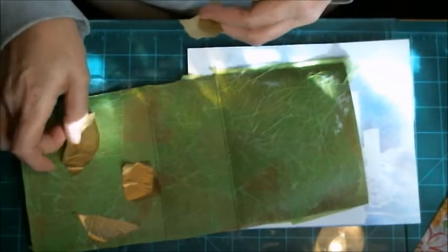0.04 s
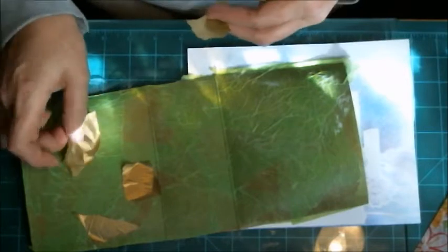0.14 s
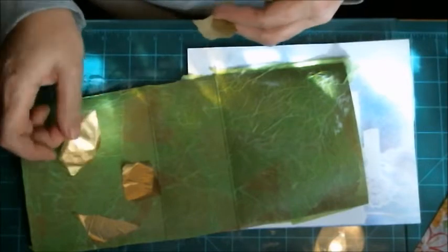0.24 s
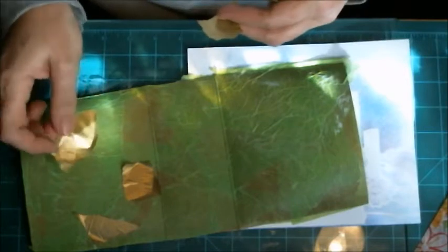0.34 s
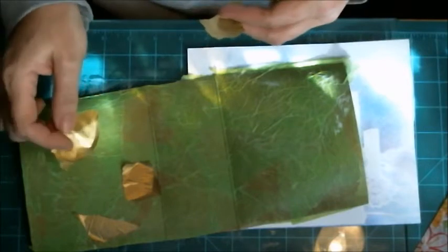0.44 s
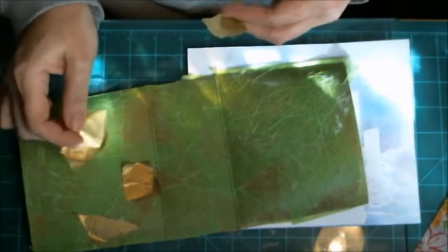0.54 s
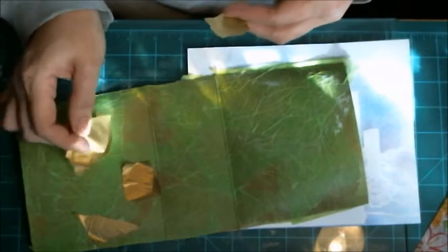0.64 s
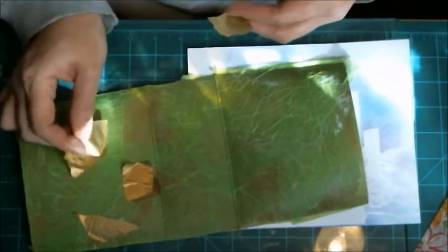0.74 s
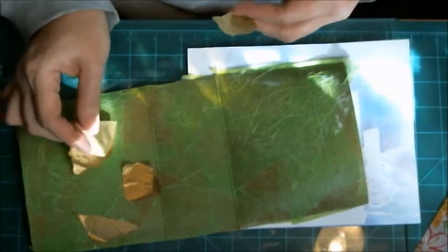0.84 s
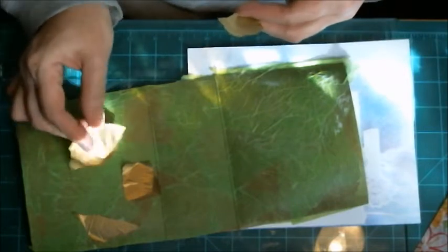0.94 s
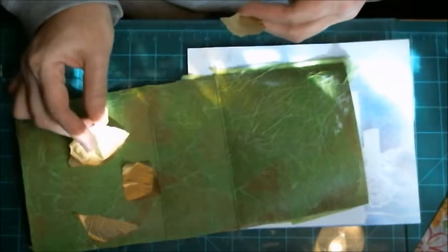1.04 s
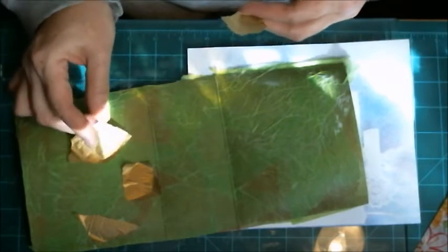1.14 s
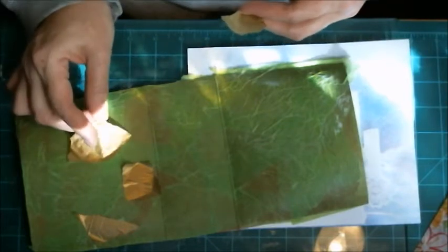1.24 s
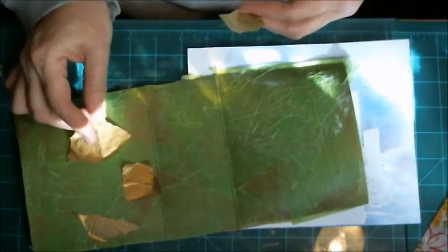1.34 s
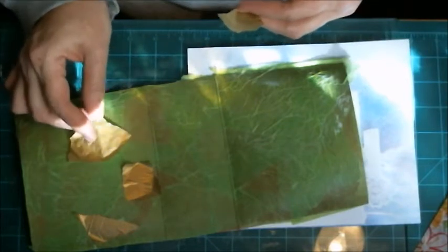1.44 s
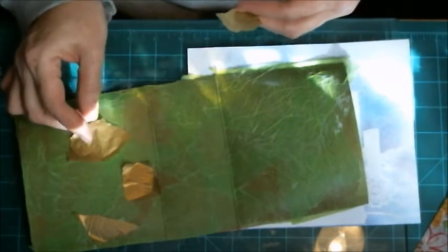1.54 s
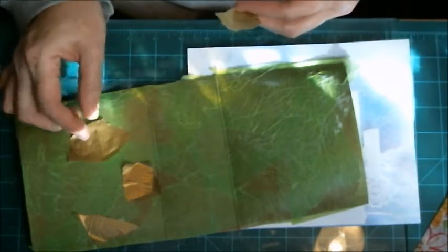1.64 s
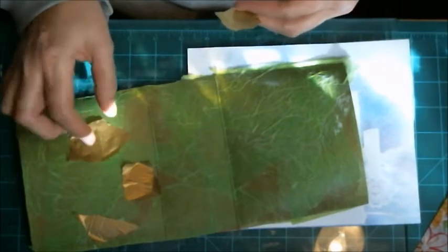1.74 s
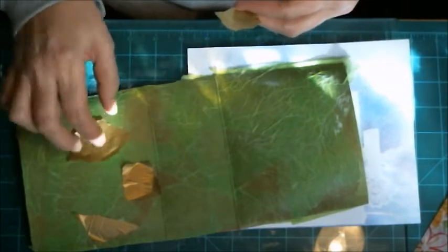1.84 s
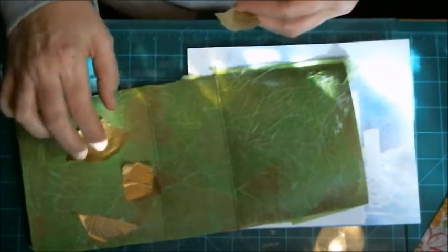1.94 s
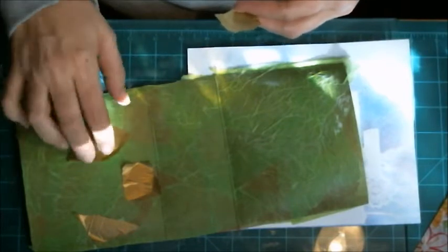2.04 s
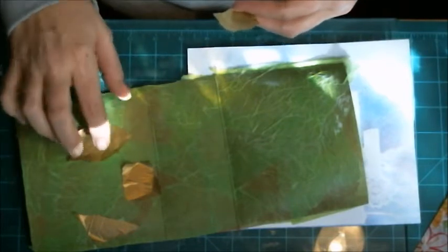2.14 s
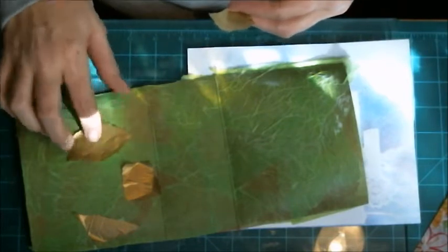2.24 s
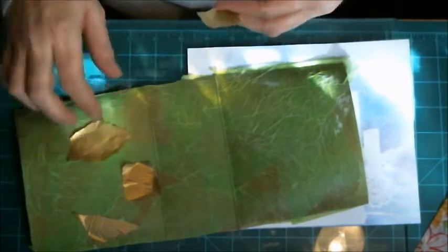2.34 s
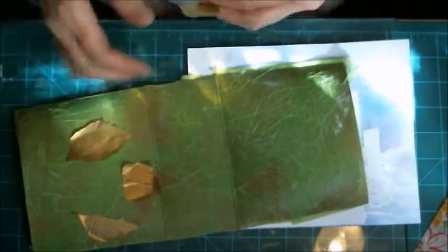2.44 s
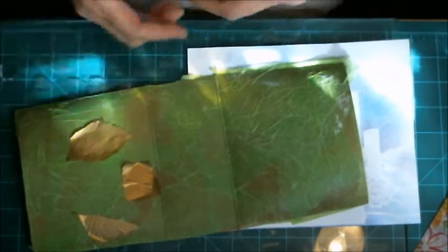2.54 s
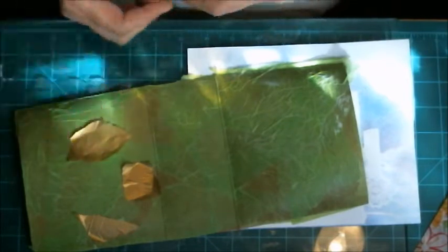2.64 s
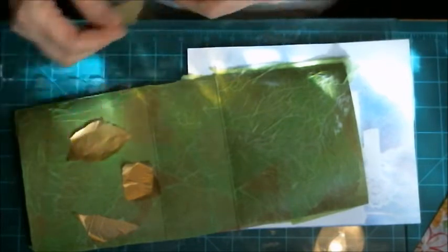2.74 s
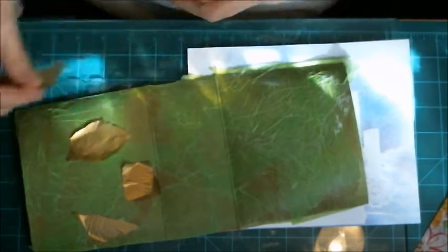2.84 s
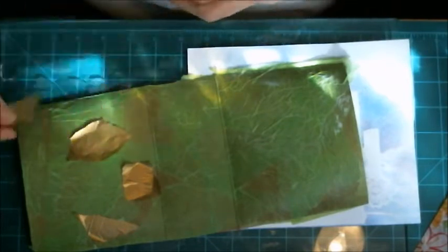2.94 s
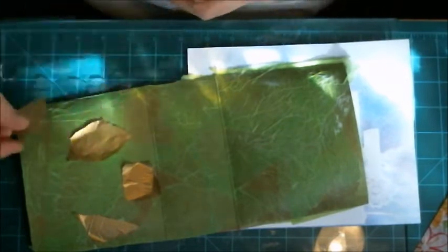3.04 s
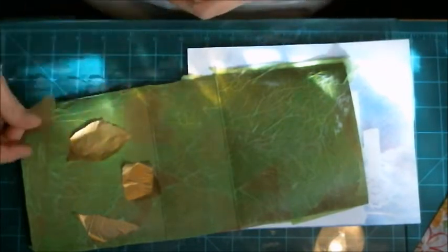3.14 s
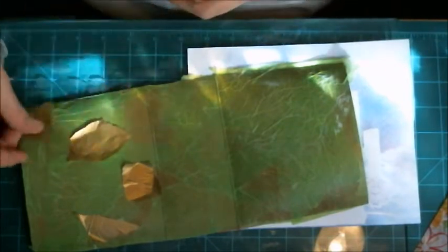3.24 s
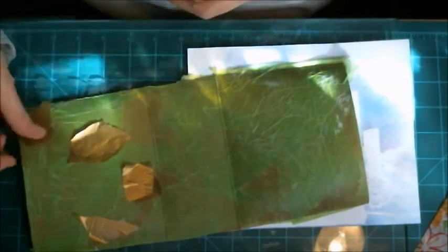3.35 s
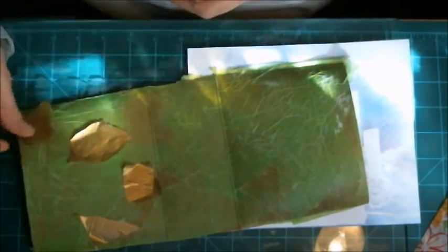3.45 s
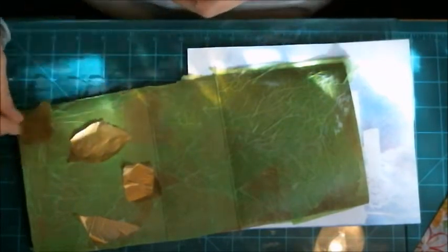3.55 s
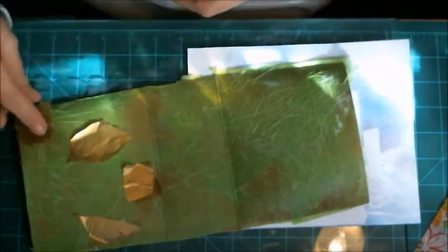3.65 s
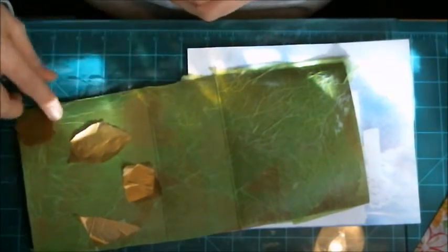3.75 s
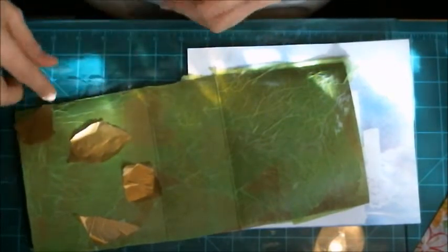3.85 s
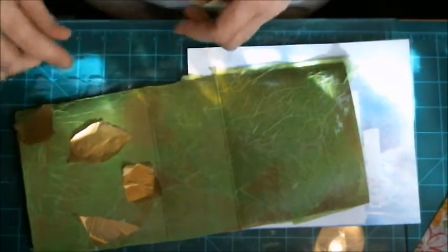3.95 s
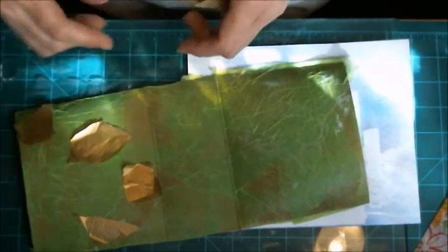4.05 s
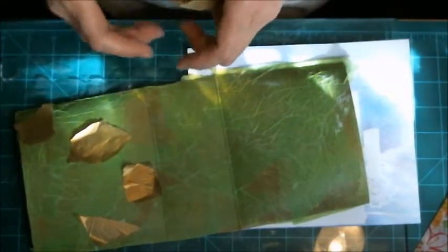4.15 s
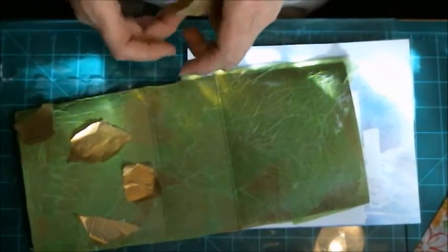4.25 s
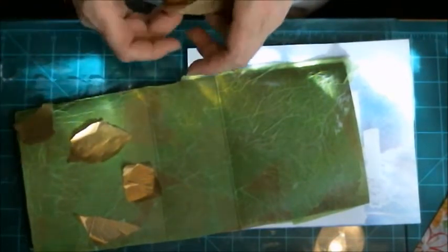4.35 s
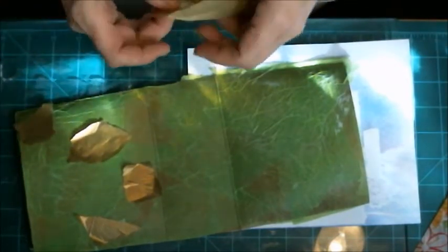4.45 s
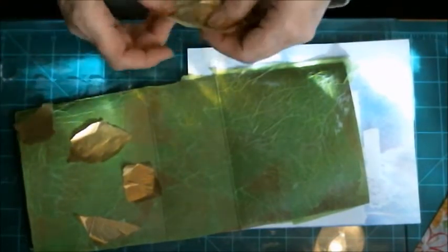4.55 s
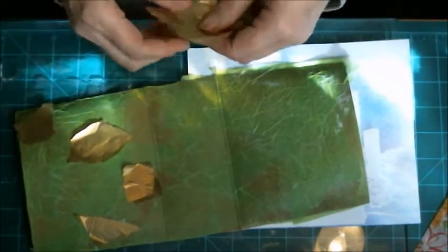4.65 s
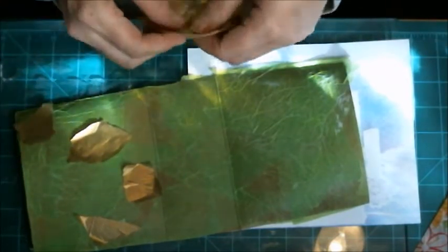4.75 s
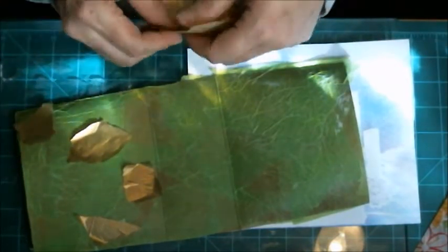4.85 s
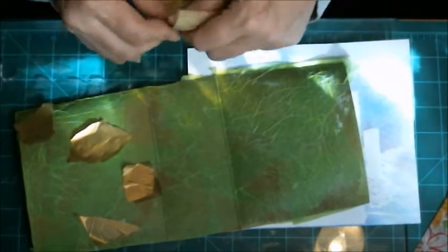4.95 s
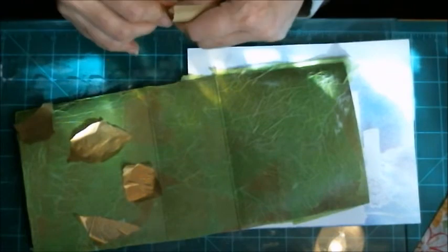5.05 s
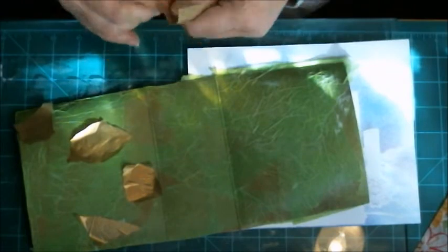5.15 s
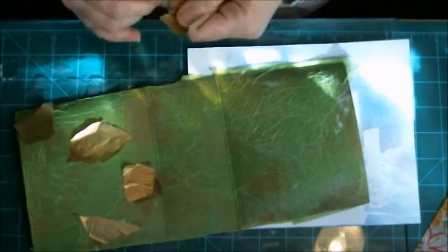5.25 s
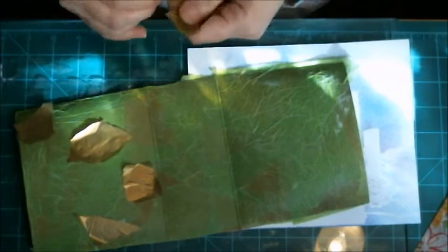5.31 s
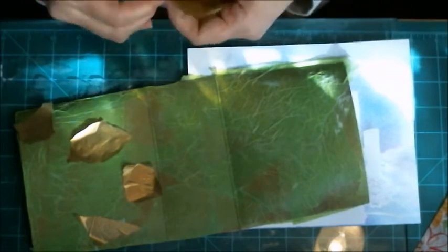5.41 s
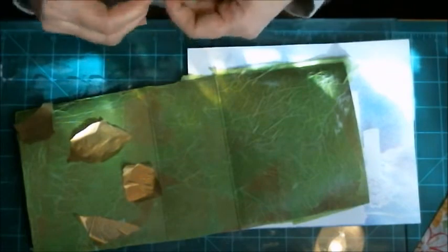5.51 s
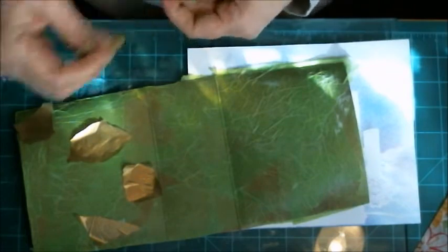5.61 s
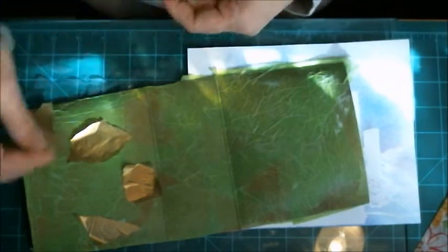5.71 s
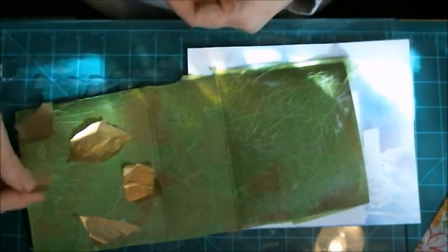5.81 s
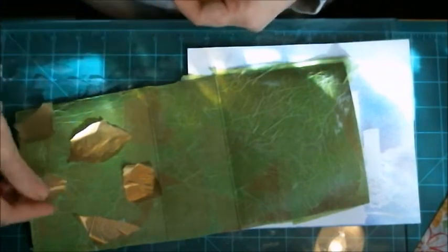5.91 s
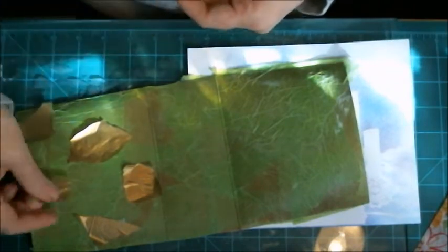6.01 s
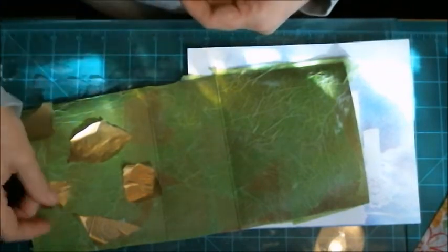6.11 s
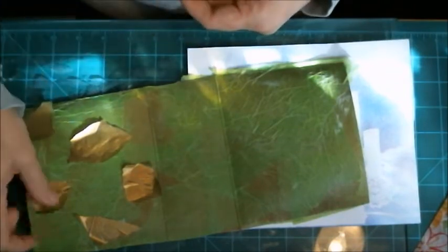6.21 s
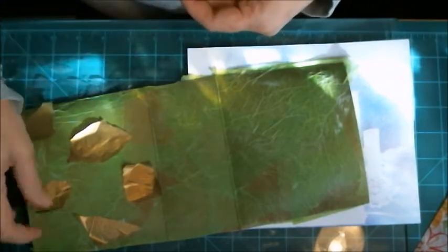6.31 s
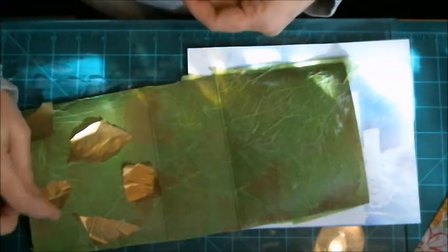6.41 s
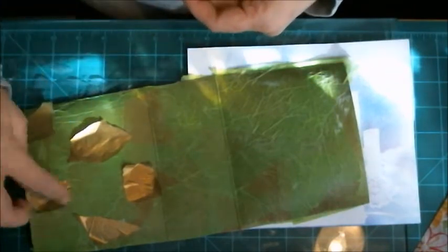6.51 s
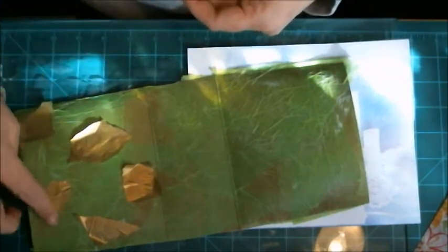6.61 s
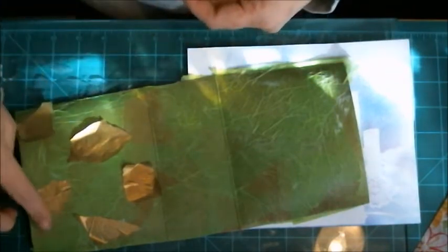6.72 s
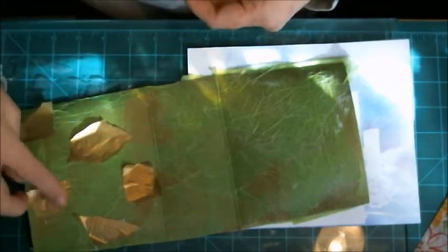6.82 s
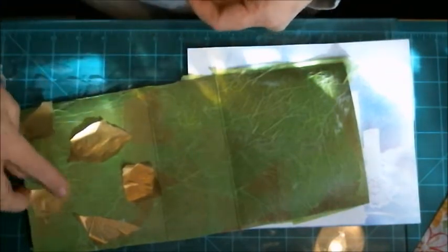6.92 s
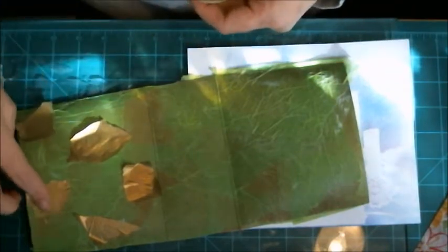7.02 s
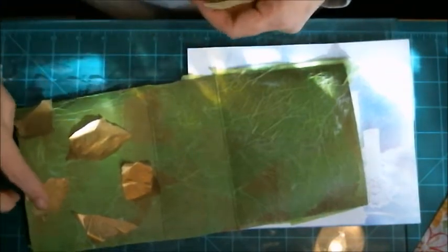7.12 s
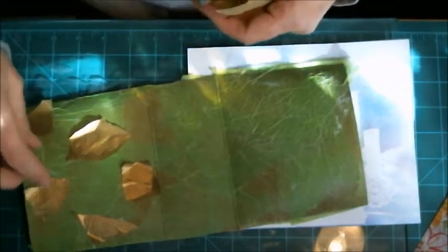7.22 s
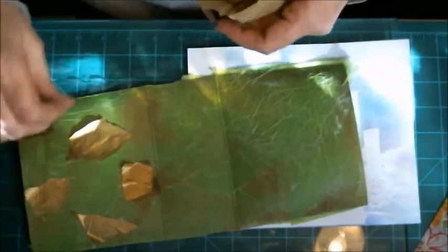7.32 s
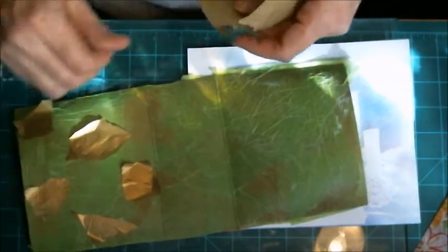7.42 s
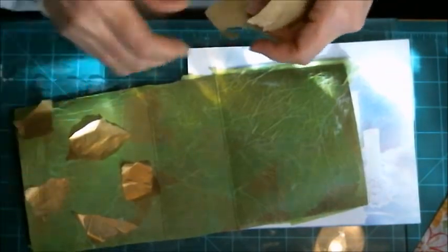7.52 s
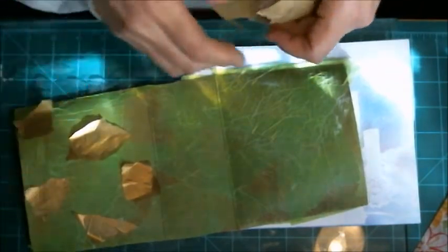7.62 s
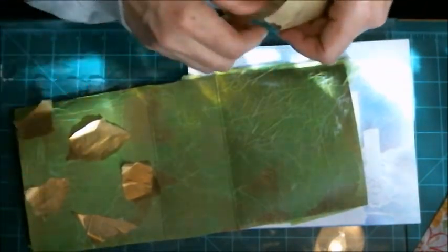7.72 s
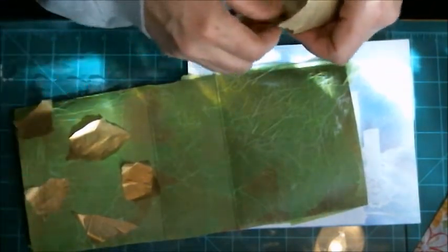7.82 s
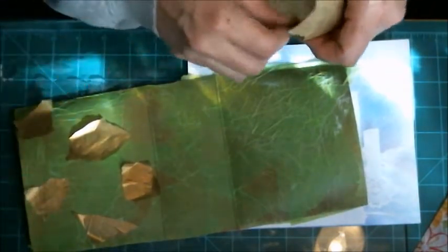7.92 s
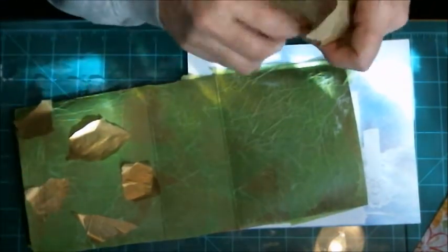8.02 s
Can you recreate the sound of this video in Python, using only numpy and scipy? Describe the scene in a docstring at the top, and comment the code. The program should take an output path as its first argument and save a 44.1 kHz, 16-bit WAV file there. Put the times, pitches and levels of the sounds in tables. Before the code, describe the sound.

Close-up of stiff metallic paper handled over a cutting mat. A few crisp crinkles and small ticks come first, with hushed gaps. Light rustling builds from about two seconds into dense, loud tearing with sharp snaps around five, ending in a hard pop. Sparse ticks and near silence follow, then crackle returns and swells to a loud tear at the end. Dry, narrow-band sound with faint low hiss.

```python
"""Bright foil crackle and sharp snaps come in bouts as fingers lay out, pinch and tear stiff foil paper.
Clumped clicks ring foil facets and bending modes of the sheet; shaped noise bursts make the creases
that snap, the dull pats and flaps of a sheet handled on a cutting mat, and narrow ringing notes.
The sound is close and narrow-band: a suppressor cuts the weak bands, a soft hiss stays underneath,
and a limiter holds down the loudest creases."""
import sys
import numpy as np
from scipy import signal
from scipy.fft import rfft, irfft, next_fast_len
from scipy.io import wavfile
from scipy.ndimage import uniform_filter1d, minimum_filter1d

SR = 44100
rng = np.random.default_rng(int(sys.argv[2]) if len(sys.argv) > 2 else 0)


def int16_out(signal):
    """Quantize to a 16-bit WAV file."""
    q = np.round(np.clip(np.atleast_2d(signal).T, -1, 1) * 32767)
    wavfile.write(sys.argv[1], SR, q.astype(np.int16))


N = 355887

# Strong creases that buckle. Each row: start in seconds, peak of the bright crack in dB,
# pitch of its facet in Hz, peak of its low part against the crack in dB.
CREASES = [(0.0255, -24.5, 7000, -43), (0.0578, -20, 7100, -46), (0.153, -26, 6900, -29),
           (0.1827, -17.5, 6900, -44), (0.557, -25, 6800, -32), (0.5658, -19, 3340, -38),
           (0.6355, -27, 6450, -35), (0.8535, -29.5, 7240, -32), (0.9075, -49, 3000, -1.5),
           (1.0274, -37, 6830, -15), (1.1972, -33.5, 6800, -30), (1.221, -34, 4600, -29),
           (1.292, -37.5, 7240, -17), (1.686, -24, 7540, -27), (1.7565, -26.5, 5530, -23),
           (2.265, -14.5, 7500, -17.5), (2.3059, -12, 6000, -26.5), (2.4014, -14.5, 3580, -23),
           (2.467, -23.5, 4500, -26), (2.5748, -13.5, 6850, -23), (2.6179, -10.5, 6100, -24),
           (2.7675, -24, 5000, -47), (2.8103, -26, 5000, -46), (2.9754, -24, 7100, -44),
           (3.001, -19.5, 4730, -28), (3.0206, -14.5, 7000, -28), (3.113, -27.5, 7240, -21),
           (3.149, -17.5, 4970, -35), (3.2255, -22, 7100, -31), (3.39, -35.5, 4800, -24),
           (3.668, -27.5, 7200, -20), (3.833, -15, 7300, -19), (3.9263, -16.5, 7250, -29),
           (3.9613, -28, 5800, -32), (4.0408, -15.5, 7000, -24.5), (4.082, -16.5, 5550, -37),
           (4.1301, -17.5, 6850, -26), (4.2431, -16, 6500, -21.5), (4.263, -17.5, 5900, -30),
           (4.3195, -15, 5300, -16.5), (4.4284, -8.5, 4600, -16), (4.4426, -8, 7260, -17.5),
           (4.514, -8.5, 6300, -15.5), (4.576, -13, 6900, -9), (4.6148, -2.5, 6040, -20.5),
           (4.6402, -0.5, 6800, -25), (4.718, -16, 6000, -20), (4.7563, -10, 6800, -16),
           (4.7945, -8, 6700, -21.5), (4.8285, -11, 5700, -20), (4.854, -3, 6040, -16.5),
           (4.917, -5.5, 6200, -21), (4.9364, -13, 6600, -27), (4.948, -8.5, 3300, -30),
           (4.989, -9, 6700, -20), (5.025, 1, 7000, -26.5), (5.0612, -11, 5100, -9),
           (5.0985, 0, 6800, -30.5), (5.1146, -3.5, 6000, -28), (5.1745, -7, 5950, -14),
           (5.2317, -3, 4800, -26), (5.2567, -10.5, 6300, -38), (5.3389, -8.5, 7000, -30),
           (5.3586, -7, 6760, -22), (5.4025, 1.5, 6950, -28), (5.4403, -5, 7180, -36),
           (5.4614, 5, 7000, -35), (5.5031, 5, 6100, -18.5), (5.6458, -23, 6800, -30),
           (5.6894, -14, 6900, -26), (5.7142, -10.5, 7300, -17), (5.7533, -12, 6650, -45),
           (5.7728, -17.5, 6000, -31), (5.8067, -25.5, 5360, -24), (6.076, -25, 5200, -36),
           (6.114, -30, 5600, -34), (6.346, -33.5, 4300, -10.5), (6.4633, -39, 7300, -10),
           (6.9874, -29.5, 7300, -37), (7.0012, -19, 7200, -43), (7.111, -25, 7000, -20),
           (7.1255, -15.5, 7100, -17), (7.1476, -18, 7000, -21), (7.239, -23.5, 5700, -17),
           (7.2918, -23, 6700, -36), (7.3035, -19, 5160, -32), (7.3733, -24.5, 5130, -45),
           (7.3985, -29, 7000, -34), (7.4225, -19, 4500, -63), (7.484, -24, 5130, -34),
           (7.4998, -21, 6840, -23), (7.577, -9.5, 4970, -27), (7.6414, -20.5, 4200, -22),
           (7.703, -15.5, 6400, -29), (7.774, -6.5, 6600, -32), (7.784, -4.5, 6700, -27),
           (7.8072, -11.5, 6600, -23.5), (7.852, -15.5, 2940, -18), (7.8888, -9, 3200, -19),
           (7.92, -10, 7000, -27), (7.9448, -5, 6100, -19), (7.9588, 0.5, 5470, -29),
           (7.989, -3.5, 5760, -18), (8.016, -15, 6700, -20), (8.0545, -3, 5500, -29)]
# Colour of the foil. Each row: frequency in Hz, relative level in dB per Hz.
FOIL_COLOUR = [(1200, -40), (2300, -13.5), (3600, -11.5), (5500, -8), (7200, -2.5), (7800, -9.5)]
# A crease with more low part also reaches further into the large facets (dB per dB).
DEPTH_FOLLOWS = 0.37


def gain_of(db):
    """Decibels to gain."""
    return 10 ** (np.asarray(db) / 20)


def evened(x):
    """Scales to rms 1."""
    return x / np.sqrt(np.mean(x ** 2) + 1e-20)


def colour_gain(points, hz):
    """Reads a colour table on a log-frequency axis, as gain."""
    f, level_db = np.transpose(points)
    return gain_of(np.interp(np.log(hz + 1), np.log(f + 1), level_db))


def add(mix, s, sound):
    """Mixes a sound in at s seconds."""
    part = mix[round(s * SR):][:len(sound)]
    part += sound[:len(part)]


def bump(hz, centre_hz, width_hz):
    """Gain of a resonance over frequency, 3 dB down at the edges of its width."""
    return 1 / np.sqrt(1 + (2 * (hz - centre_hz) / width_hz) ** 2)


def coloured(x, gain):
    """Shapes the spectrum of x by gain(hz)."""
    size = next_fast_len(len(x))
    return irfft(rfft(x, size) * gain(np.fft.rfftfreq(size, 1 / SR)), size)[:len(x)]


def burst(noise, gain, db, t60, rise):
    """Coloured noise that swells quickly and dies away, with the given peak."""
    t = np.arange(len(noise)) / SR
    swell = 1 - np.exp(-(t / rise) ** 2)
    x = coloured(noise, gain) * swell * gain_of(-60 * t / t60)
    return gain_of(db) * x / abs(x).max()


def drift(s):
    """Slow chance that holds for about s seconds, at rms 1."""
    return evened(uniform_filter1d(rng.standard_normal(N), max(int(s * SR), 1)))


def smoothed(z, frames):
    """Averages a spectrogram over 3 bands and the given number of frames."""
    return uniform_filter1d(uniform_filter1d(z, size=3, axis=0), size=frames, axis=1)


def handling():
    """Level of the steady crackle, silent between bouts, and the share of the sheet's rattle in dB."""
    # One list per bout. Each row: time in seconds, steady crackle level in dB,
    # share of the held sheet's low rattle in dB.
    bouts = [
        [(0.0, -49, -17), (0.1, -31.5, -26.5), (0.17, -57, -6.5), (0.23, -66.5, 1), (0.32, -51, -22)],
        [(0.86, -57, -28), (0.92, -49.5, -14), (1.0, -70, -12)],
        [(2.16, -67, 4), (2.185, -52.5, -0.5), (2.25, -62.5, 4), (2.3, -38.5, -17.5), (2.52, -40, -22),
         (2.64, -40, -15), (2.74, -48.5, -5), (2.8, -43.5, -14), (2.87, -55.5, -32), (2.94, -46, -27),
         (3.02, -54, 6), (3.1, -50, -34), (3.25, -50, -6.5), (3.33, -68, -23), (3.38, -55.5, -27),
         (3.45, -61, -20)],
        [(3.6, -56, -24), (3.65, -51, -1), (3.68, -46.5, -10), (3.87, -43, -19.5), (4.12, -37.5, -20.5),
         (4.3, -30.5, -22), (4.5, -23, -24.5), (4.63, -20.5, -19), (4.72, -27.5, -20), (4.9, -23, -17.5),
         (5.0, -21.5, -22), (5.12, -15.5, -23), (5.27, -18, -21.5), (5.3, -29, -16.5), (5.39, -28, -10.5),
         (5.42, -15, -11), (5.53, -18, -19.5), (5.6, -39, -16.5), (5.77, -32.5, -8.5), (5.87, -53, -11.5),
         (6.05, -57, -9.5), (6.12, -41, -28), (6.2, -61.5, -6.5)],
        [(6.85, -55, -6), (6.93, -50, -17), (6.98, -55, -15.5), (7.03, -38.5, -20.5), (7.14, -38, -11),
         (7.2, -46, -16), (7.25, -32, -26), (7.34, -41, -25), (7.4, -52.5, -23), (7.5, -33.5, -28.5),
         (7.56, -37, -14.5), (7.69, -43, -20.5), (7.76, -40.5, -18.5), (7.86, -32, -24), (7.92, -14.5, -20),
         (8.03, -17, -14.5), (8.07, -12.5, -19)],
    ]
    s, level_db, low_db = np.transpose([row for bout in bouts for row in bout])
    t = np.arange(N) / SR
    active = sum((t > bout[0][0]) * (t < bout[-1][0]) for bout in bouts)
    fade = uniform_filter1d(active * 1., 800)  # softens the ends of each bout
    return gain_of(np.interp(t, s, level_db)) * fade, np.interp(t, s, low_db)


def settling():
    """Level of the crackle each snap leaves behind as its crease settles, in small and large facets."""
    settle_db, settle_t60, rise_s = -15, 0.13, .004  # dB against the snap's peak, s, s
    small, large, t = np.zeros(N), np.zeros(N), np.arange(0, .3, 1 / SR)
    for s, db, _, low_db in CREASES:
        power = gain_of(db + settle_db - 60 * t / settle_t60) ** 2 * (1 - np.exp(-t / rise_s))
        add(small, s, power)
        add(large, s, power * gain_of(DEPTH_FOLLOWS * low_db) ** 2)
    return np.sqrt(small), np.sqrt(large)


def fibres(per_s, clumps_db):
    """Parting fibres: sparse clicks of uneven size that come in clumps of loudness."""
    spread_db = 2.5
    hit, size, sign = rng.random((3, N))
    size_db = -spread_db * np.log(size + .01) + clumps_db
    return gain_of(size_db) * (hit < per_s / SR) * np.sign(sign - .5)


def facets():
    """Parting fibres ring foil facets for a few cycles each; returns small and large facets apart."""
    fibres_per_s = 6800  # shared by ten facet pitches
    tau = np.arange(256) / SR
    small, large, clumps_db = np.zeros(N), np.zeros(N), 3.3 * drift(0.0021)
    for hz in np.geomspace(2300, 7600, 10):
        ring = np.sin(2 * np.pi * hz * tau) * np.exp(-tau * hz)
        clicks = fibres(fibres_per_s / 10, clumps_db + 2.3 * drift(0.019))
        ringing = np.sqrt(hz) * signal.oaconvolve(clicks, evened(ring))[:N]
        add(small if hz > 4500 else large, 0, ringing)
    return [evened(coloured(x, lambda hz: colour_gain(FOIL_COLOUR, hz))) for x in (small, large)]


def sheet_rattle():
    """Clicks shake the bending modes of the held sheet, which come and go as the grip shifts."""
    # Each row: pitch in Hz, width in Hz, level in dB.
    modes = [(330, 40, -17.5), (560, 94, -13), (900, 120, -2.5), (1320, 370, -5), (1830, 200, -2.5),
             (2150, 170, -9)]
    tau, rattle = np.arange(2048) / SR, np.zeros(N)
    for f, width, db in modes:
        decay = np.exp(-np.pi * width * tau)
        ring = np.sin(2 * np.pi * f * tau) * decay * (1 - decay)
        ringing = evened(signal.oaconvolve(fibres(700, 3.5 * drift(0.022)), ring)[:N])
        rattle += gain_of(db) * np.sqrt(width) * ringing
    return evened(coloured(rattle, lambda hz: 1 / (1 + (290 / (hz + 1)) ** 10)))  # steep low cut


def crackle():
    """Handling and settling creases ring facets of all sizes; slow bending favours large ones and rattle."""
    small_db, large_db = -2.5, -8.5  # facet shares; the large one is for a rattle share of 0 dB
    large_follows = 0.38  # large facets rise with the rattle (dB per dB)
    (steady, low_db), (after, after_large) = handling(), settling()
    small, large = facets()
    rattle = sheet_rattle()
    small_level = gain_of(small_db) * np.hypot(steady, after)
    steady_large = steady * gain_of(large_db + large_follows * low_db)
    large_level = np.hypot(steady_large, after_large)
    return small_level * small + steady * gain_of(low_db) * rattle + large_level * large


def pats():
    """Soft blows on paper over the mat are short dull notes; flaps and ringing notes are narrower."""
    # Dull pats of sheet and fingertips. Each row: start in seconds, peak in dB, pitch in Hz.
    dull_blows = [(0.063, -46, 1160), (0.119, -45, 1080), (2.041, -35, 1004), (2.173, -41, 1040),
                  (2.467, -41, 1680), (2.7, -32, 1260), (2.946, -40.5, 1350), (3.666, -42.5, 1010),
                  (4.431, -32, 934), (5.084, -27.5, 1450), (5.119, -33, 833), (5.396, -24.5, 1370),
                  (5.432, -22, 1300), (5.507, -15.5, 1860), (5.688, -39.5, 1210), (5.716, -39.5, 880),
                  (7.119, -27, 1086), (7.893, -36, 1390), (7.978, -28, 923), (8.037, -24.5, 940)]
    # The whole sheet flaps in its lowest mode. Each row: start in seconds, peak in dB.
    sheet_flaps = [(2.18, -52), (2.27, -55), (2.368, -56.5), (3.375, -50), (4.457, -45), (5.114, -38.5),
                   (5.43, -47), (5.459, -35.5), (5.69, -48), (5.772, -46.5), (7.126, -48), (7.844, -50.5),
                   (7.916, -39), (7.974, -33), (8.033, -38)]
    # Narrow ringing notes, low and high, some very short. Each row: start in seconds, peak in dB,
    # pitch in Hz, T60 in seconds (the note stops after 0.19 s at most).
    ringing_notes = [(.005, -54.5, 1130, 0.53), (.08, -45, 1453, 0.11), (.185, -53, 1520, 0.12),
                     (.634, -51.5, 3780, 0.093), (0.851, -56.5, 4510, .3), (.89, -54.5, 2840, 0.17),
                     (.91, -52, 1760, .12), (.925, -54, 1260, 0.16), (1.024, -57.5, 2830, .1),
                     (1.197, -58.5, 4550, 0.32), (2.172, -58, 1900, 0.13), (2.36, -50, 1816, 0.79),
                     (2.699, -45.5, 1770, 0.13), (2.702, -42, 2440, 0.094), (2.704, -44, 2950, .1),
                     (2.799, -54, 458, 0.14), (3.2, -50, 1161, 0.58), (3.885, -43, 1560, 0.1),
                     (4.498, -39.5, 894, 0.046), (4.755, -38, 856, 0.12), (5.5, -22, 1770, 0.052),
                     (5.5, -28.5, 1236, 0.12), (5.501, -30.5, 3850, 0.067), (5.499, -29.5, 2460, .1),
                     (5.5, -25, 2800, .12), (5.5, -29, 3240, 0.059), (6.044, -47, 1590, .18),
                     (6.345, -48, 2445, 0.054), (6.345, -45, 4390, 0.042), (6.624, -55.5, 2937, 0.13),
                     (7.246, -54.5, 966, 0.27), (7.29, -53, 2170, .25), (7.382, -48.5, 1840, 0.048),
                     (7.535, -51, 936, 0.24), (7.66, -55, 930, 0.8), (7.739, -56, 940, 0.72),
                     (7.822, -56, 950, 0.46)]
    t60 = 0.11  # s, pats and flaps
    # Gathered rows: start in seconds, peak in dB, pitch in Hz, width in Hz (6 dB down), T60 in seconds.
    rows = [(s, db, hz, 0.28 * hz, t60) for s, db, hz in dull_blows]
    rows += [(s, db, 335, 60., t60) for s, db in sheet_flaps]
    rows += [(s, db, hz, 45, ring_t60) for s, db, hz, ring_t60 in ringing_notes]
    rows += [(5.519, -40.5, 124, 120., .05)]  # the hand jerks free and jolts the table
    out = np.zeros(N)
    for (s, db, note_hz, width, dying_s), noise in zip(rows, rng.standard_normal((len(rows), 8192))):
        add(out, s, burst(noise, lambda hz: bump(hz, note_hz, width) ** 2, db, dying_s, 0.0037))
    return out


def snap(noise, db, facet_hz, low_db):
    """A buckling crease rings its own facet of foil on top of a broad crack, with a low part beneath."""
    t60, full_scale_rise_s = 0.025, 0.0015
    rise_follows = 0.32  # louder snaps swell in more slowly (dB per dB)

    def high(hz):
        broad = np.where(hz < 4200, gain_of(DEPTH_FOLLOWS * low_db), .4)
        return colour_gain(FOIL_COLOUR, hz) * (broad + bump(hz, facet_hz, 940)) * (hz > 2500)

    def low(hz):
        return bump(hz, 2054, 670) ** 2

    crack = burst(noise, high, db, t60, full_scale_rise_s * gain_of(rise_follows * db))
    return crack + burst(noise, low, db + low_db, 0.015, 0.0042)


def snaps():
    """The strong creases, and lesser ones that fall by chance while the sheet is handled."""
    ticks_per_s = 110  # lesser creases, while handled
    tick_db, spread_db = 2, 5.5  # over the steady crackle: base level, random spread
    out, (steady, low_db) = np.zeros(N), handling()
    for (s, *row), noise in zip(CREASES, rng.standard_normal((len(CREASES), 1024))):
        add(out, s, snap(noise, *row))
    count = 1000  # candidates, thinned to the wanted rate
    chance, noises = rng.random((count, 4)), rng.standard_normal((count, 1024))
    for (when, used, size, pitch), noise in zip(chance, noises):
        at = int(when * N)
        if used < ticks_per_s * N / SR / count and steady[at] > 1e-4:
            db = 20 * np.log10(steady[at]) + tick_db - spread_db * np.log(size + 0.082)
            add(out, at / SR, snap(noise, db, 3500 + 3700 * pitch, low_db[at]))
    return out


def table(x):
    """Sheet, mat and near walls give a short dense tail of sparse taps."""
    t60 = 0.06  # s
    taps = np.zeros(8000)
    at = np.arange(40, 7980, 20) + rng.integers(0, 20, 397)  # one tap in every 20 samples
    taps[at] = rng.choice([-1., 1.], len(at)) * gain_of(-60 * at / SR / t60)
    return signal.oaconvolve(x, taps / np.linalg.norm(taps))[:N]


def patchy(x):
    """Random narrow patches of the spectrum swell and fade."""
    z = signal.stft(x, nperseg=1024, noverlap=768)[2]
    patches = evened(smoothed(rng.standard_normal(z.shape), 9))
    shape = gain_of(4.5 * patches)
    shape /= np.sqrt(np.mean(shape ** 2))
    return signal.istft(z * shape, nperseg=1024, noverlap=768)[1][:N]


def scene():
    """Blows arrive directly; random narrow patches of the spectrum swell and fade in rustle and tail."""
    blows, rustle = snaps() + pats(), crackle()
    tail = gain_of(-9) * table(blows + rustle)
    return (blows + patchy(rustle + tail))[None]


def suppressed(x):
    """The suppressor shuts bands whose smoothed power stays under a threshold."""
    z = signal.stft(x, nperseg=1024, noverlap=768)[2]
    band_db = 10 * np.log10(abs(smoothed(abs(z) ** 2, 7)) + 1e-20)
    opening = 1 / (1 + np.exp(np.clip((-74.5 - band_db) / 1.5, -30, 30)))  # threshold -74.5 dB
    opening = np.maximum(opening, gain_of(-11.5))  # shut bands still leak a little
    return signal.istft(z * opening, nperseg=1024, noverlap=768)[1][:N]


def soft_hiss(edge_hz):
    """Steady noise at rms 1, weighted to the lows and cut at the band edge."""
    # Each row: frequency in Hz, relative level in dB per Hz.
    hiss_colour = [(20, -16.5), (50, 0), (115, -1), (250, -7), (700, -13), (1200, -15), (3600, -21),
                   (7800, -17.5)]
    return evened(coloured(rng.standard_normal(N), lambda hz: colour_gain(hiss_colour, hz) * (hz < edge_hz)))


def record(dry):
    """Suppressor, then hiss, the narrow band limit and a limiter that ducks around peaks."""
    edge_hz, hiss_db, ceiling = 7700, -65.5, .9  # Hz, rms dB, full scale 1
    kept = suppressed(dry[0])
    edge = signal.firwin(255, edge_hz, window=("kaiser", 7), fs=SR)
    x = signal.oaconvolve(kept + gain_of(hiss_db) * soft_hiss(edge_hz), edge, "same")
    room_left = minimum_filter1d(ceiling / np.maximum(abs(x), ceiling), size=161)
    limited = x * uniform_filter1d(room_left, size=81)
    return signal.oaconvolve(limited, edge, "same")[None]


dry = scene()
out = record(dry)
int16_out(out)
```